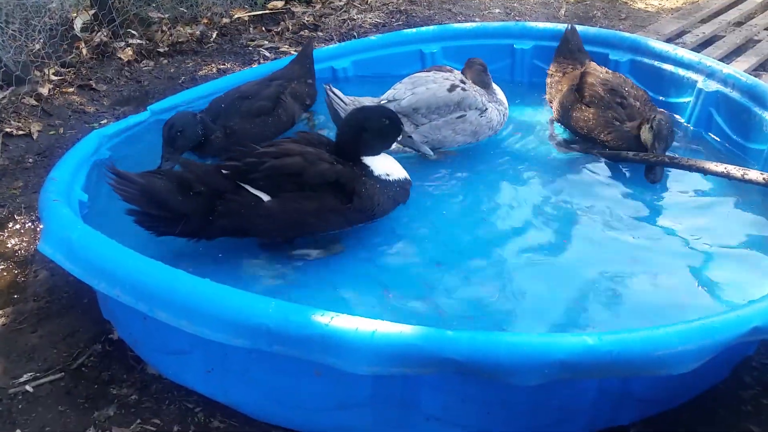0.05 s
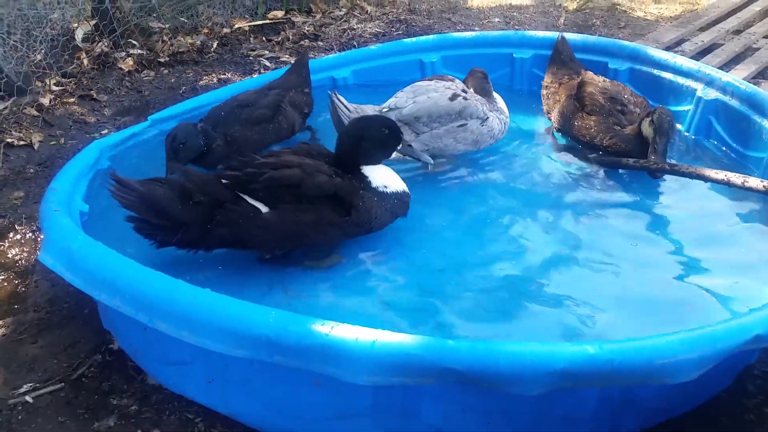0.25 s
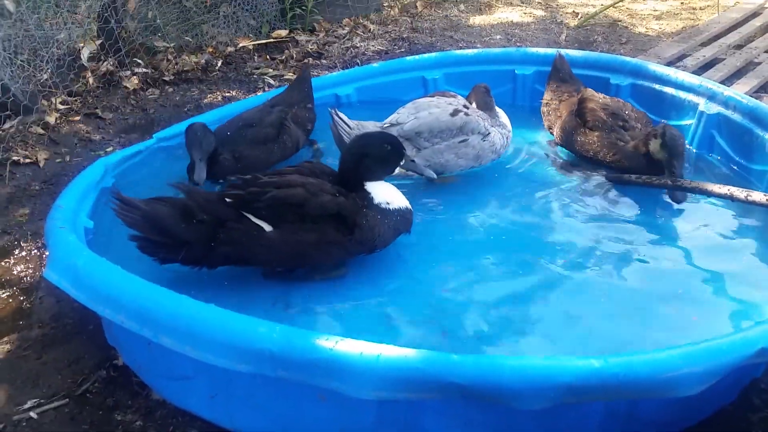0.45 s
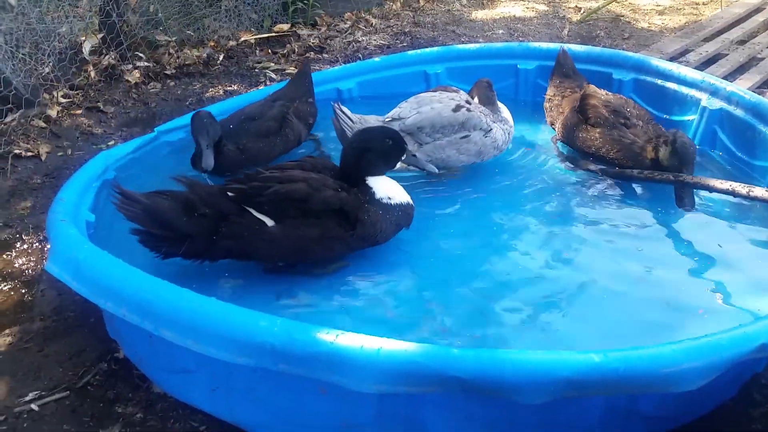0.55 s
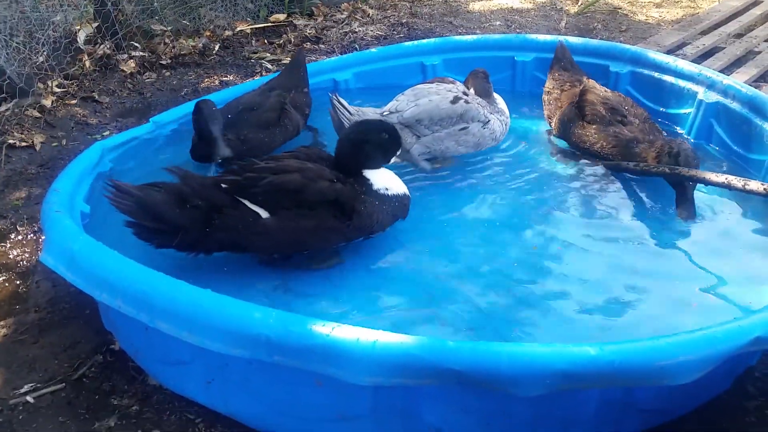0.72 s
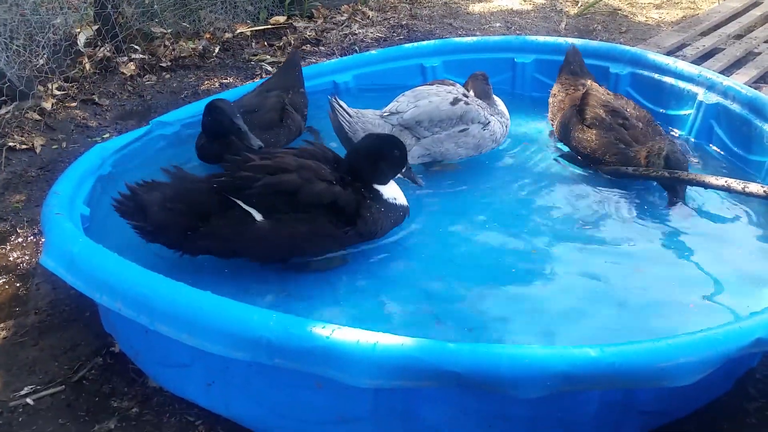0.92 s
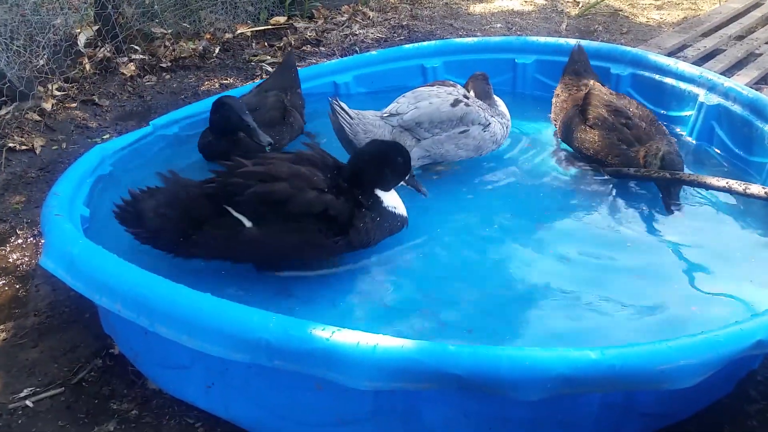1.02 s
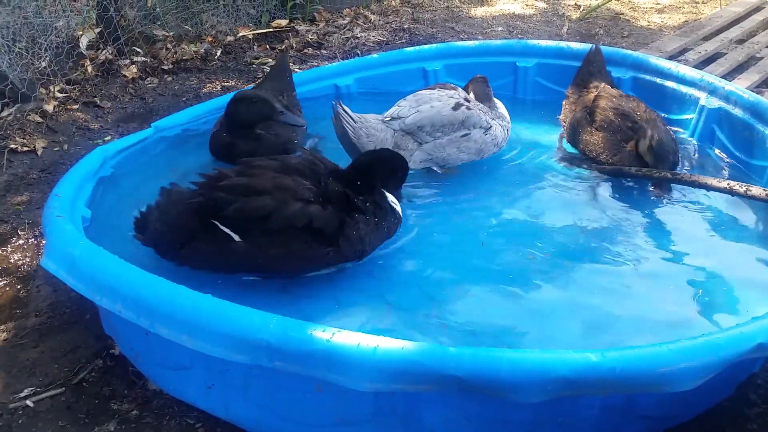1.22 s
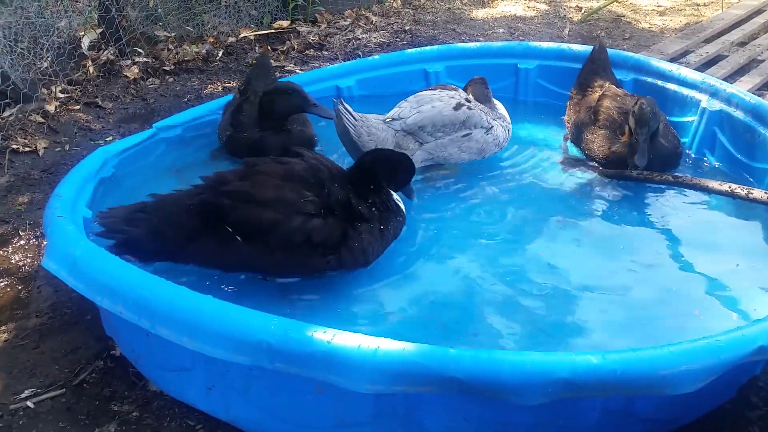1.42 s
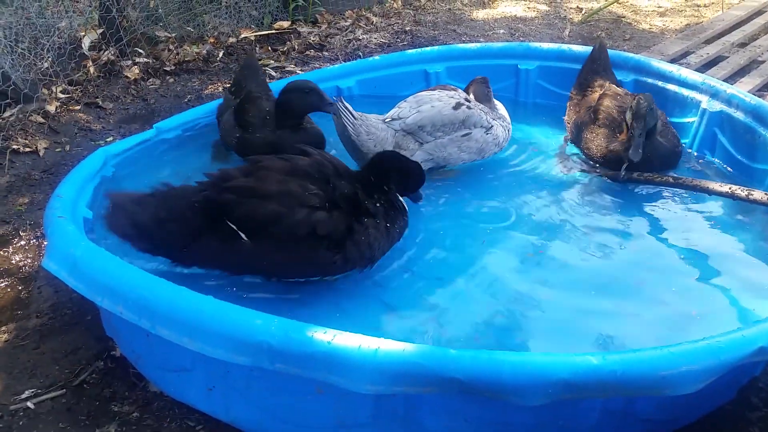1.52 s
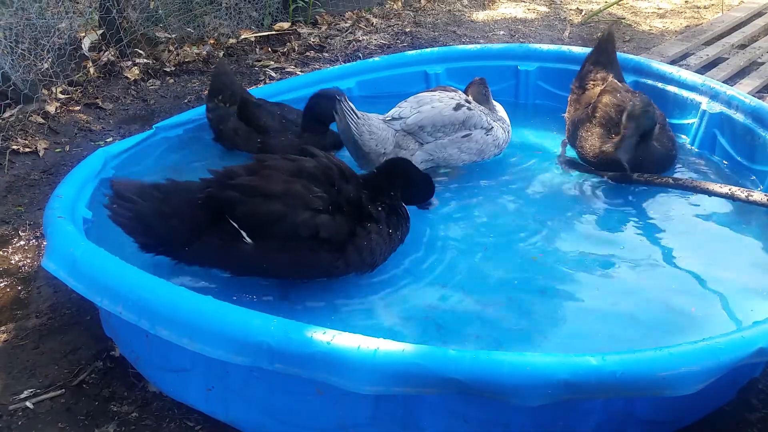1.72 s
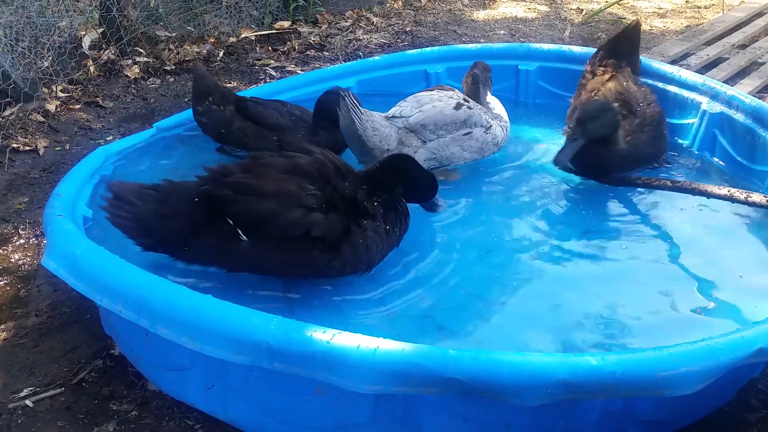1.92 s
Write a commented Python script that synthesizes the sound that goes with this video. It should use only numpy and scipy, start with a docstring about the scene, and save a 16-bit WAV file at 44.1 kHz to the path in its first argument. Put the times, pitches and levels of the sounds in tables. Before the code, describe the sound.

Close handling noise: uneven scraping and dull thumps from a finger on a phone's microphone, followed by light clicks on the case. Quiet outdoor air rumbles underneath, with tiny water drips from ducks in a paddling pool.

```python
"""Finger on a phone beside a duck pool

A finger scrapes over a phone's left microphone port in tiny slips of skin, judders and bumps it,
then ticks against the case as the grip settles; the right port hears little of it. Behind that are
low outdoor rumble, microphone hiss and a paddling pool where ducks sit quietly: a few faint drips
from their bills ring as bubbles, and fine droplets fizz."""
import sys
import numpy as np
from scipy import signal
from scipy.fft import rfft, irfft
from scipy.io import wavfile
from scipy.ndimage import uniform_filter1d

SR = 44100
rng = np.random.default_rng(int(sys.argv[2]) if len(sys.argv) > 2 else 0)


def materialize(psi):
    """Save the field psi as 16-bit PCM at rate SR to the path in sys.argv[1].

    A 1-D psi becomes a single channel; in a 2-D psi each row is a channel.
    """
    bounded = np.clip(np.atleast_2d(psi).T, -1, 1)
    quanta = np.round(bounded * 32767).astype(np.int16)
    wavfile.write(sys.argv[1], SR, quanta)


N = 85995
TIME = np.arange(N) / SR
WATER_LEFT_DB = -9.5  # the water sits to the right


def undb(db):
    """Decibels to gain."""
    return 10 ** (np.asarray(db) / 20)


def unit(x):
    """Scale to an RMS of 1."""
    return x / np.sqrt(np.mean(x ** 2))


def curve(rows):
    """A fader ride through (seconds, dB) points."""
    return undb(np.interp(TIME, *np.array(rows).T))


def colour(x, points, tilt_db=0):
    """Minimum-phase EQ through (Hz, dB) points, tilted per octave from 250 Hz to 4 kHz."""
    size = 2 ** 17
    octave = np.log2(np.maximum(np.fft.rfftfreq(size, 1 / SR), 1) / 1000)
    hz, db = np.array(points).T
    gain = undb(np.interp(octave, np.log2(hz / 1000), db) + tilt_db * np.clip(octave, -2, 2))
    cepstrum = irfft(np.log(gain))
    cepstrum[1:size // 2] *= 2  # folded, so the ring follows the hit
    cepstrum[size // 2 + 1:] = 0
    return irfft(rfft(x, size) * np.exp(rfft(cepstrum)))[:N]


def walk(per_s):
    """A wobble that glides between random values, at an RMS of 1."""
    hold = max(int(SR / per_s), 1)
    return unit(uniform_filter1d(np.repeat(rng.standard_normal(2000), hold)[:N], hold))


def noise(points):
    """Noise shaped by (Hz, dB) points, at an RMS of 1."""
    return unit(colour(rng.standard_normal(N), points))


def background():
    """Wavering outdoor rumble and microphone hiss, unrelated at the two ports; dull and quiet at first."""
    # Tone of the air at each port and of the hiss. Each row: frequency in Hz, relative level in dB.
    left_eq = [(20, -14.5), (50, 6.5), (120, 2.5), (250, -15), (600, -16.5), (1100, -22.5), (1600, -33),
               (2200, -42.5), (2850, -26.5), (3150, -38.5), (3600, -23.5), (4300, -33), (5200, -48),
               (6200, -83.5), (9000, -59)]
    right_eq = [(20, -8.5), (50, 3.5), (130, 2.5), (250, -10), (420, -11.5), (620, -22), (1000, -28),
                (1600, -32), (2200, -38), (4000, -36), (5200, -44.5), (6200, -51), (9000, -63.5)]
    hiss_eq = [(6000, -40), (8600, -15), (10200, 2), (12000, 6.5), (14500, -1)]
    # Their fader rides. Each row: time in seconds, level in dB.
    left_ride = [(0, -53.5), (.18, -48.5), (.3, -39.5), (1.2, -42.5), (1.5, -43.5), (1.95, -40)]
    right_ride = [(0, -53.5), (.19, -49), (.4, -41), (.56, -41.5), (.85, -41.5), (1.15, -44.5), (1.6, -43),
                  (1.95, -43.5)]
    hiss_ride = [(0, -86.5), (.17, -88), (.22, -72), (.7, -67.5), (1.15, -73), (1.4, -68), (1.95, -70)]
    opened = np.interp(TIME, (0.15, 0.36), [0, 1])
    ports = []
    for eq, ride in ((left_eq, left_ride), (right_eq, right_ride)):
        white = rng.standard_normal(N)
        dull = unit(colour(white, eq, tilt_db=-1.5))
        air = opened * unit(colour(white, eq)) + (1 - opened) * dull
        waver = undb(0.47 * walk(per_s=25))
        ports.append(air * curve(ride) * waver + noise(hiss_eq) * curve(hiss_ride))
    return np.array(ports)


def spatter():
    """Tiny droplets land, each a brief fizz."""
    # Droplets. Each row: start in seconds, centre of the fizz in Hz, level on the right in dB.
    droplets = [(.368, 11100, -55), (0.576, 12500, -58), (.764, 5200, -61), (.798, 11900, -54),
                (1.034, 5550, -68), (1.053, 6070, -68), (1.304, 11000, -65), (1.366, 10500, -65.5),
                (1.398, 10700, -57), (1.488, 11000, -58.5), (1.501, 4840, -55), (1.52, 6600, -72)]
    t60_s, skirt_db = 0.02, -60.5
    out = np.zeros(N)
    for start, hz, db in droplets:
        fade = (TIME > start) * np.exp(-np.log(1000) * np.maximum(TIME - start, 0) / t60_s)
        fizz = noise([(hz / 2, skirt_db), (hz, 0), (hz * 2, skirt_db)])
        out += undb(db) * fade * fizz
    return np.outer([undb(WATER_LEFT_DB), 1], out)


def drips():
    """Drips from the ducks' bills make small splashy bubbles that flutter, ring and rise in pitch."""
    # Bubbles. Each row: start in seconds, opening pitch in Hz, level in dB before flutter and panning.
    bubbles = [(.366, 2100, -51), (1.428, 2500, -57), (1.792, 1720, -54)]
    t60_s, glide_per_s = .025, 1.2
    out = np.zeros(N)
    for start, hz, db in bubbles:
        age = np.clip(TIME - start, 0, .1)
        ring = np.sin(2 * np.pi * hz * age * (1 + glide_per_s * age / 2))
        out += undb(db) * np.exp(-np.log(1000) * age / t60_s) * ring
    flutter = 1 + 0.7 * walk(per_s=540)
    return np.outer([undb(WATER_LEFT_DB), 1], out * flutter)


def slips(per_s=5000, scatter_db=3):
    """A dense random train of tiny slips of skin, uneven in size."""
    slipping = rng.random(N) < per_s / SR
    return slipping * undb(scatter_db * rng.standard_normal(N)) * np.sign(rng.standard_normal(N))


def judder(rate_hz=175, jitter=.12):
    """The fingertip sticks and slips: one uneven pulse each time the skin lets go."""
    # The judder's brief swell. Each row: time in seconds, level in dB.
    ride = [(.225, -59), (.25, -29), (.275, -27), (.305, -36.5), (.345, -30), (.365, -60), (.5, -100)]
    # Its tone. Each row: frequency in Hz, relative level in dB.
    eq = [(60, -14.5), (170, 1), (350, -7.5), (700, -12.5), (1500, -28), (3000, -45), (6000, -75.5)]
    cycles = np.cumsum(rate_hz * (1 + jitter * walk(per_s=150))) / SR
    pulses = np.diff(np.floor(cycles), prepend=0) * undb(2 * walk(per_s=150))
    return unit(colour(pulses, eq)) * curve(ride)


def rubbing():
    """Shuddering slips ring the port, brighter as the finger presses; skin drags on the case and rumbles."""
    # Tone of light touch, firm touch and drag. Each row: frequency in Hz, relative level in dB.
    light_eq = [(60, -16), (120, 4), (180, 6), (300, 4.5), (450, 0), (700, -4), (1050, -6), (1500, -14),
                (2000, -16.5), (2400, -24.5), (2850, -30.5), (3150, -27.5), (3600, -22.5), (4300, -40),
                (5000, -59), (6000, -77), (8800, -65.5), (10300, -34.5), (14500, -41.5)]
    firm_eq = [(120, -12), (300, -3.5), (520, -7.5), (720, -1), (880, 0), (1250, -4), (1700, -8),
               (2000, -19), (2400, -28.5), (2850, -22), (3150, -28), (3600, -20), (4300, -37), (5000, -47),
               (6000, -74.5), (8800, -79), (10300, -42), (14500, -44.5)]
    drag_eq = [(20, -11.5), (45, 4.5), (90, 1.5), (150, -4), (250, -9.5), (380, -16), (700, -32),
               (2000, -90.5)]
    # Fader rides of the scrape and the drag. Each row: time in seconds, level in dB.
    scrape_ride = [(.197, -71), (.203, -34.5), (.228, -27), (.244, -42), (.262, -23.5), (.3, -28.5),
                   (.362, -34), (.46, -29), (.505, -34.5), (.538, -26.5), (.568, -38), (.588, -31),
                   (.604, -48), (.622, -43.5), (.632, -34), (.715, -34), (.735, -34), (.762, -21),
                   (.776, -36), (.81, -42), (.836, -22), (.856, -42.5), (.9, -35), (.935, -46.5),
                   (.96, -55), (1.04, -53), (1.072, -45.5), (1.1, -63.5), (1.2, -57)]
    drag_ride = [(.197, -71), (.205, -43), (.25, -30.5), (.33, -35.5), (.39, -30), (.46, -29.5),
                 (.505, -33.5), (.54, -28.5), (.605, -27.5), (.65, -30), (.71, -29.5), (.765, -21),
                 (.8, -37), (.845, -26), (.93, -32.5), (.975, -44.5), (1.015, -35), (1.08, -34.5),
                 (1.13, -46.5), (1.32, -35), (1.42, -62.5), (1.95, -57)]
    shudder_db, leak_db = 0.8, -31
    skin = slips() * undb(shudder_db * walk(per_s=150))
    press = np.interp(TIME, (0.37, 0.71), [0, 1])
    scrape = (1 - press) * unit(colour(skin, light_eq)) + press * unit(colour(skin, firm_eq))
    left = scrape * curve(scrape_ride) + judder() + noise(drag_eq) * curve(drag_ride)
    return np.array([left, undb(leak_db) * left])


def ticks():
    """Each tick is a crack in the port's resonances, a creep of skin, a knock of the body and a low thud."""
    # Ticks on the case. Each row: start in seconds, crack peak in dB, thud drive in dB, crack tilt in
    # dB per octave, knock level in dB, crack low-pass in Hz, thud pitch in Hz.
    contacts = [(0.9891, -21, -22, -0.5, -23, 2590, 86), (1.2543, -15, -16, 1, -43, 11900, 73),
                (1.2964, -11, -16, 2.5, -48, 13600, 92), (1.3508, -12.5, -15, 0, -32, 14100, 103.5),
                (1.6609, -15.5, -16.5, 3.5, -19, 11000, 105), (1.6795, -8, -12, 0.5, -14, 14100, 97),
                (1.8377, -21.5, -17.5, 3, -18, 3000, 102)]
    # The port's ring, and the leak to the right port. Each row: frequency in Hz, gain in dB.
    crack_eq = [(100, -33), (300, -14.5), (480, 3.5), (650, 1.5), (980, 5), (1350, -7.5), (1900, -17),
                (2350, -32), (2850, -10), (3150, -17.5), (3650, -5), (4300, -20), (5200, -33.5),
                (6100, -50), (7000, -45.5), (8400, -60), (10800, -34.5), (14500, -42.5)]
    leak_eq = [(100, -20), (600, -30), (1200, -24), (3600, -22), (6000, -3), (11000, -3.5), (15000, 9.5)]
    creep_db, creep_t60_s = -29, 0.046
    knock_hz, knock_t60_s = 302, 0.0056
    push_lag_s, push_width_s, thud_q = 0.00061, 0.00042, 3.25
    left = np.zeros(N)
    for start, crack_db, thud_db, tilt_db, knock_db, top_hz, thud_hz in contacts:
        age = np.maximum(TIME - start, 0)
        skin = (TIME > start) * slips() / 2
        creep = undb(creep_db) * np.exp(-np.log(1000) * age / creep_t60_s) * skin
        crack = colour(signal.unit_impulse(N, int(start * SR)) + creep, crack_eq, tilt_db)
        crack = signal.lfilter(*signal.butter(2, top_hz, fs=SR), crack)
        crack /= np.abs(crack).max()
        push = np.exp(-((TIME - start - push_lag_s) / push_width_s) ** 2 / 2)
        omega = 2 * np.pi * thud_hz
        resonant_highpass = signal.bilinear([1, 0, 0], [1, omega / thud_q, omega ** 2], SR)
        thud = signal.lfilter(*resonant_highpass, push)
        knock = np.sin(2 * np.pi * knock_hz * age) * np.exp(-np.log(1000) * age / knock_t60_s)
        left += undb(crack_db) * crack + undb(thud_db) * thud + undb(knock_db) * knock
    return np.array([left, colour(left, leak_eq)])


def bumps():
    """The fingertip slaps the port and squeezes its air; the case carries some to the right, inverted."""
    # Soft bumps, one swing of pressure each. Each row: centre in seconds, pitch in Hz, peak in dB,
    # push (1) or release (-1), leak to the right port in dB, slap peak in dB.
    presses = [(0.1014, 202, -47, 1, -0.5, -42.5), (0.2463, 156, -18, -1, -30.5, -43),
               (0.4744, 190, -20.5, 1, -30, -38), (0.4799, 170, -12, -1, -26, -39),
               (0.5932, 70, -16, -1, -22, -32), (0.617, 65, -25.5, 1, -20, -55),
               (0.7369, 150, -6, 1, -47, -41), (0.7462, 200, -1.3, 1, -37, -18.5),
               (.761, 170, -7.5, 1, -40.5, -31), (0.7714, 210, -14, 1, -43, -41.5),
               (.777, 85, -12, 1, -35, -53), (0.8245, 105, -14.5, 1, -15, -25),
               (0.8544, 54.7, -23.5, 1, -26, -55), (1.0651, 185, -20, 1, -11, -25),
               (1.2393, 219, -17.5, 1, -14, -20)]
    # Tone of the skin's slap. Each row: frequency in Hz, relative level in dB.
    slap_eq = [(100, 4.5), (400, 0.5), (720, 9), (1200, -8), (1800, -23.5), (2400, -29.5), (3600, -33),
               (6000, -67)]
    slap_lead_s = 0.0016
    slap = colour(signal.unit_impulse(N), slap_eq)
    slap /= np.abs(slap).max()
    out = np.zeros((2, N))
    for centre, hz, db, direction, leak_db, slap_db in presses:
        phase = 2 * np.pi * hz * (TIME - centre)
        swing = np.sign(direction) * undb(db) * phase * np.exp((1 - phase ** 2) / 2)
        contact = undb(slap_db) * np.roll(slap, int((centre - slap_lead_s) * SR))
        out += np.outer([1, -undb(leak_db)], swing + contact)
    return out


def scene():
    """Close handling noise over the outdoor air and faint water, in stereo."""
    return rubbing() + bumps() + ticks() + background() + drips() + spatter()


def record(dry):
    """The phone cuts the top steeply above 14.9 kHz."""
    return signal.sosfilt(signal.ellip(10, .2, 80, 14900, fs=SR, output="sos"), dry)


dry = scene()
out = record(dry)
materialize(out)
```